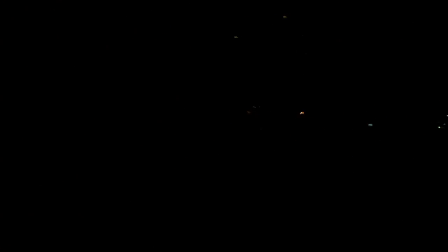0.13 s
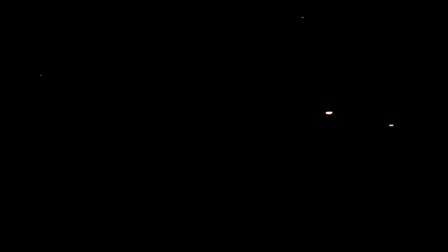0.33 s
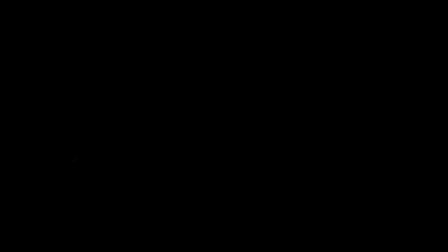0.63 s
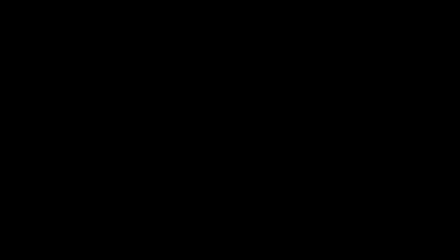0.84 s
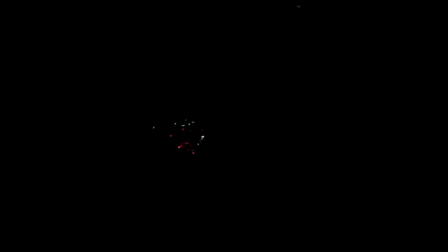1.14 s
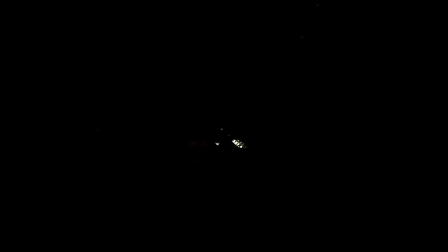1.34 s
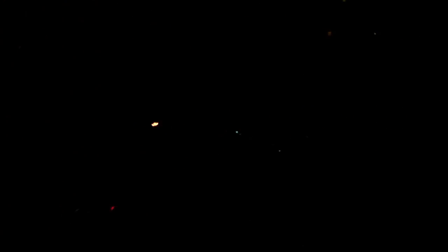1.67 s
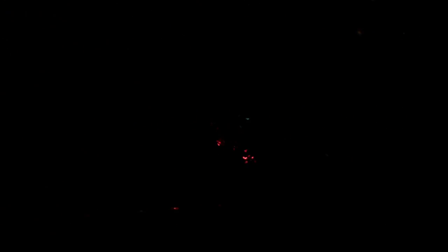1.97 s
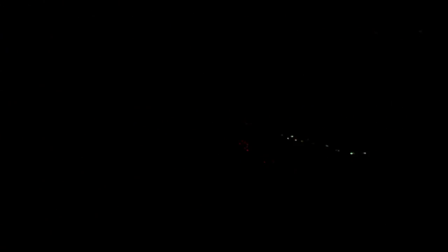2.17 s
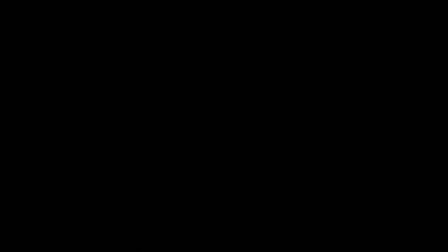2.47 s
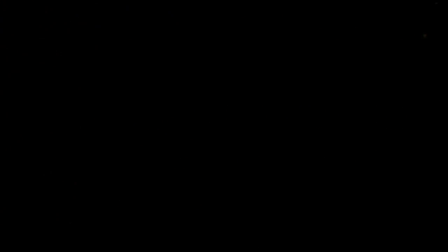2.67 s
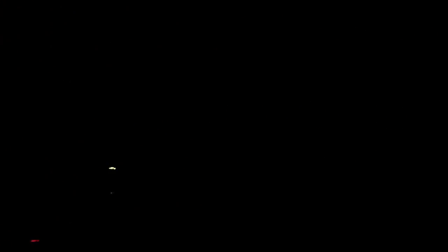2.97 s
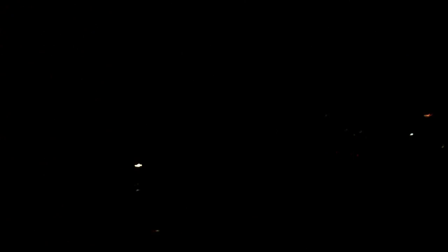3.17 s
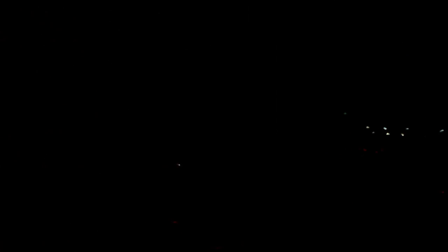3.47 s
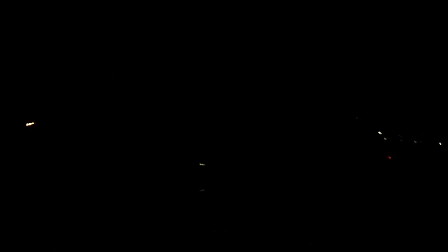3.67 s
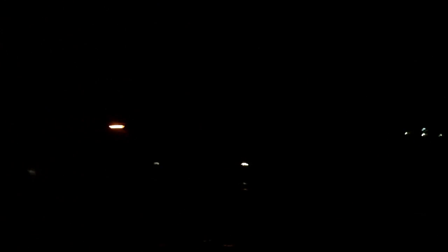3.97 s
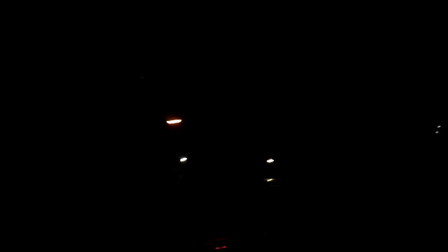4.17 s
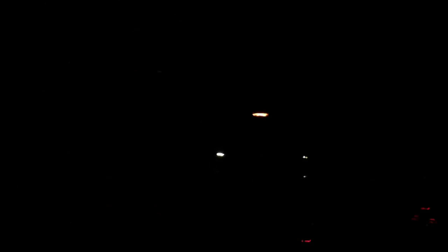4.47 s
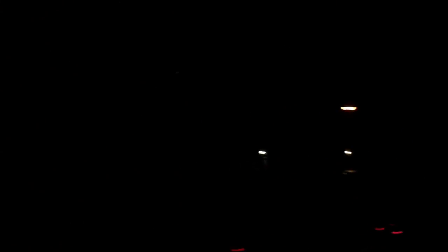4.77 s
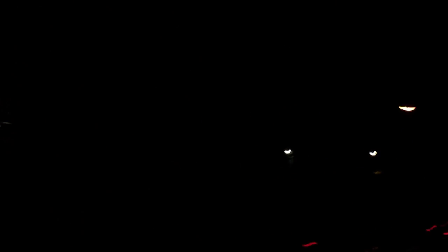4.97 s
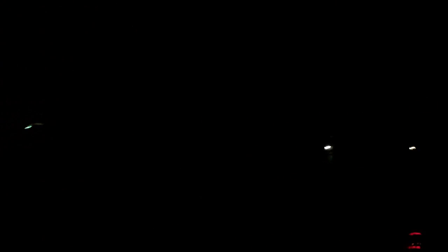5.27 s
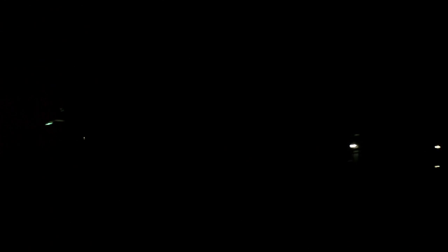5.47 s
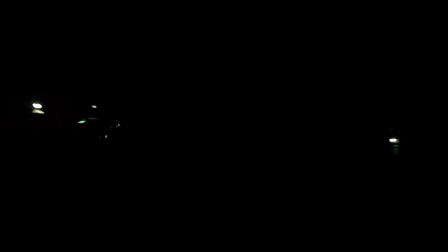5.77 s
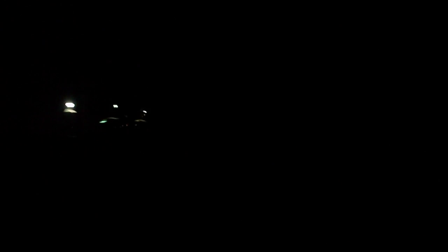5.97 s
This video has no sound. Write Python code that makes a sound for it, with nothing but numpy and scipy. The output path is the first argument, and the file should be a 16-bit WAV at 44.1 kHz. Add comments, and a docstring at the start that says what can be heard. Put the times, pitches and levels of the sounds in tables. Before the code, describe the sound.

A commuter train rumbles and roars heard from on board, with surging air noise, dry knocks of a loose fitting, small ticks and a brief wheel squeal.

```python
"""The running gear of a commuter train rumbles and roars, heard from on board by a window.
Its filtered noise, like the rush of air, builds in surges that break off; jolts boom in the car body.
A loose fitting knocks, bumps ring the floor and small parts tick, all as decaying modes; snaps crackle.
The wheels scrape in narrow noise bands and briefly squeal on one wavering tone."""
import sys
import numpy as np
from scipy import signal
from scipy.fft import rfft, irfft, next_fast_len
from scipy.io import wavfile

SR = 44100
rng = np.random.default_rng(int(sys.argv[2]) if len(sys.argv) > 2 else 0)


def unload_wav(signal):
    """Save mono or channel-first audio to the path in sys.argv[1] as 16-bit WAV at rate SR, clipped to [-1, 1]."""
    wavfile.write(
        sys.argv[1],
        SR,
        np.round(np.clip(np.atleast_2d(signal).T, -1, 1) * 32767).astype(np.int16),
    )


N = 269451
TIME = np.arange(N) / SR  # s

# the louder ticks of small parts in the frame: t/s, relative level/dB
TICK_TIMES = [(0.093, -38), (0.164, -33), (0.3049, -40), (0.314, -41), (0.396, -40), (0.4909, -40),
              (0.5634, -36.5), (0.6332, -39), (0.7438, -38.5), (0.9235, -36), (0.9318, -40), (1.177, -37),
              (1.1874, -34), (1.339, -39.5), (1.4282, -33.5), (1.5878, -36), (1.6253, -36.5),
              (1.8908, -26.5), (1.9252, -37), (1.9915, -40), (2.2413, -30.5), (2.6282, -36),
              (2.7115, -37.5), (2.7378, -38.5), (3.306, -38), (3.332, -37.5), (3.498, -40), (3.785, -39),
              (3.828, -36), (3.8361, -33), (3.871, -39), (4.153, -39), (4.1787, -26.5), (4.271, -39.5),
              (4.5182, -36), (4.587, -35.5), (4.7575, -39), (4.8227, -39), (4.8782, -35), (5.022, -38),
              (5.0944, -36.5), (5.2559, -37), (5.283, -35.5), (5.817, -33.5), (5.9408, -37.5)]


def gain_of(db):
    """Decibels to amplitude."""
    return 10 ** (np.asarray(db) / 20)


def evened(x):
    """Scales to rms 1."""
    return x / np.sqrt(np.mean(x ** 2) + 1e-20)


def add(mix, s, sound):
    """Mixes a sound in at time s."""
    part = mix[max(round(s * SR), 0):][:len(sound)]
    part += sound[:len(part)]


def noise(shape):
    """Noise of rms 1 whose amplitude spectrum follows the function shape(Hz)."""
    size = next_fast_len(N)
    spectrum = rfft(rng.standard_normal(size)) * shape(np.fft.rfftfreq(size, 1 / SR))
    return evened(irfft(spectrum, size)[:N])


def coloured(points):
    """Noise with a spectrum drawn through (Hz, dB) points."""
    hz, db = np.transpose(points)
    return noise(lambda f: gain_of(np.interp(np.log(f + 1), np.log(hz), db)))


def drift(rate_hz):
    """Random wandering of rms 1, fading out above the given rate."""
    return noise(lambda f: np.exp(-(f / rate_hz) ** 2))


def steadied(x, span_s):
    """Takes the slow swells out of a noise and keeps its flutter."""
    window = np.hanning(max(int(span_s * SR), 8))
    power = signal.oaconvolve(x ** 2, window, "same")
    return evened(x / np.sqrt(np.abs(power) + 1e-9))


def ring(modes, spread, contact_s):
    """One blow on a set of modes, swelling over the time of contact; no two blows land alike."""
    t = np.arange(SR // 20) / SR
    sound = np.zeros(len(t))
    for k, (hz, db, t60) in enumerate(modes):
        louder, sharper = rng.standard_normal(2)
        decay = gain_of(db + louder - 60 * t / t60)
        # neighbouring modes swing in opposite senses
        sound += (-1) ** k * decay * np.sin(2 * np.pi * hz * (1 + spread * sharper) * t)
    return sound * (1 - np.exp(-(t / contact_s) ** 2))


def surging(column, cruise_db, stretch, hold_s, release_s, build_shape=1.83):
    """Gain of one layer: each surge builds, holds briefly and collapses to the running level."""
    # surges of noise: break t/s, build time/s (before stretch),
    # then relative level/dB of column 0 air rush, 1 wheel roar, 2 rumble
    surges = [(0.167, 0.061, -46, -28.5, -20.5), (0.314, 0.082, -46, -37, -22.5),
              (0.40, 0.13, -52, -32.5, -29), (0.637, 0.11, -47.5, -31.5, -39),
              (0.744, 0.083, -44, -35, -26.5), (0.927, .026, -43, -33, -21.5),
              (1.185, 0.14, -42.5, -30.5, -26), (1.426, 0.085, -44, -30, -22),
              (1.62, 0.073, -49.5, -34, -26.5), (1.891, 0.12, -38, -29, -21),
              (2.272, 0.16, -47.5, -31.5, -25.5), (2.467, 0.19, -42, -34, -30.5),
              (2.601, 0.082, -36, -22, -23), (2.714, 0.072, -49, -33.5, -32), (2.868, 0.07, -49, -39, -34),
              (3.075, .049, -39, -25, -25.5), (3.246, 0.086, -37.5, -20.5, -21.5),
              (3.322, 0.093, -52, -32.5, -24), (3.50, 0.062, -46, -39, -26.5),
              (3.831, 0.1, -44, -27.5, -21.5), (4.07, 0.13, -48.5, -42, -27.5),
              (4.192, 0.065, -56.5, -29.5, -25), (4.413, 0.029, -44, -33.5, -34),
              (4.518, .08, -52, -31.5, -27.5), (4.588, 0.022, -44.5, -27, -26.5),
              (4.773, 0.063, -45, -26.5, -17.5), (4.821, .036, -42, -26.5, -20.5),
              (4.877, .02, -53, -30.5, -19.5), (5.019, 0.022, -49, -26, -22), (5.093, .036, -52, -39, -29),
              (5.271, 0.096, -53, -32, -28), (5.488, 0.071, -43.5, -32, -27),
              (5.647, 0.09, -37, -25.5, -19.5), (5.812, 0.2, -48, -29, -27.5),
              (5.985, 0.099, -45, -41, -30.5), (6.11, 0.13, -42, -33, -27.5)]
    # running noise between the surges: t/s, level/dB around cruise_db
    cruise = [(0, 2), (0.5, -1), (1.25, -2.5), (2, -2.5), (2.7, 4), (3.4, 1.5), (3.65, 3.5), (3.9, -2.5),
              (4.3, 4), (4.9, -0.5), (5.35, -2.5), (6.11, 1)]
    t = TIME[::64]  # a coarse grid is enough for a level curve
    power = gain_of(cruise_db + np.interp(t, *np.transpose(cruise))) ** 2
    for s, build, *dbs in surges:
        ahead = np.maximum(s - hold_s - t, 0)
        age = np.maximum(t - s, 0)
        # build_shape: 1 = exponential growth, 2 = bell-shaped
        swell = (ahead / (build * stretch)) ** build_shape
        power += (gain_of(dbs[column]) * np.exp(-swell - age / release_s)) ** 2
    return np.interp(TIME, t, np.sqrt(power))


def dips(depth_db=3, fall_s=0.003, recovery_s=0.023):
    """Gain that dips briefly after each of the louder ticks; dips that overlap add up in dB."""
    age = np.maximum(TIME - np.array(TICK_TIMES)[:, :1], 0)
    dip = (1 - np.exp(-age / fall_s)) * np.exp(-age / recovery_s)
    return gain_of(-depth_db * dip.sum(0))


def air(rush_db=6.5, flutter_db=1.74, draught_db=-48, whirl_db=-2.5):
    """Turbulent rush past the window with a wandering midrange whirl, over a faint steady draught."""
    # spectrum of the rush: f/Hz, relative level/dB
    rush_colour = [(200, 8), (600, 7), (950, 6.5), (1400, -2.5), (1800, -1), (2400, -1), (3000, 1),
                   (3550, -8.5), (4400, -7), (6500, -10.5), (8300, -13.5), (9000, -18), (10700, -24),
                   (12000, -45), (13300, -28), (15400, -22), (15800, -48)]
    rush = gain_of(rush_db) * coloured(rush_colour) * gain_of(flutter_db * drift(rate_hz=220))
    whirl = coloured([(500, -29), (1100, 5.5), (2000, 3), (3000, -1.0), (4000, -41.5)])
    whirl *= gain_of(whirl_db + 1.2 * drift(rate_hz=3.0))
    draught = coloured([(300, 3.5), (900, -2.5), (1500, -10.0), (2900, -2.5),
                        (3600, -21.5), (8000, -19.5), (12000, -65)])
    level = surging(0, cruise_db=-52.5, stretch=1.38, hold_s=0.0064, release_s=0.016)
    return level * (rush + whirl) + gain_of(draught_db) * draught


def crackle(count=190, loudest_db=-29, range_db=17, snap_s=0.00055):
    """Tiny dry snaps without any ring, scattered at random."""
    out, t = np.zeros(N), np.arange(SR // 100) / SR
    for when, size, sense in rng.random((count, 3)):
        level = np.sign(sense - .5) * gain_of(loudest_db - range_db * size)
        add(out, when * N / SR, level * np.exp(-t / snap_s))
    return out


def tick_ring():
    """The short, bright ring of a small part: a few quickly decaying modes."""
    # modes of the small parts: f/Hz, relative level/dB, t60/s
    part_modes = [(2350, -27, 0.0012), (4750, 5, 0.0023), (8040, -7.5, 0.0028), (9800, 1, 0.0017),
                  (14100, -4.5, 0.0024)]
    return ring(part_modes, spread=0.0058, contact_s=0.00031)


def rattle(count=70, loudest_db=-34, range_db=13):
    """Many fainter ticks, scattered at random."""
    out = np.zeros(N)
    for when, size in rng.random((count, 2)):
        add(out, when * N / SR, gain_of(loudest_db - range_db * size) * tick_ring())
    return out


def ticks(tick_db=12, push_db=-17, push_s=0.00075, bounce_s=.001, bounce_db=-6):
    """Each tick is a bright ring with a quick bounce, on a dull push."""
    out, u = np.zeros(N), np.arange(SR // 40) / SR / push_s
    push = gain_of(push_db) * (u * np.exp(1 - u)) ** 2
    for (s, db), (lag, sense) in zip(TICK_TIMES, rng.random((len(TICK_TIMES), 2))):
        add(out, s, gain_of(db + tick_db) * tick_ring())
        # the bounce follows after 0.5 to 1.5 times bounce_s
        add(out, s + bounce_s * (.5 + lag), gain_of(db + tick_db + bounce_db) * tick_ring())
        add(out, s, np.sign(sense - .5) * push)
    return out


def bumps(bump_db=0, shove_db=2, shove_rise_s=0.00075, shove_decay_s=0.0036):
    """Short blows from the track shove the floor and ring it."""
    # dull bumps from the track: t/s, relative level/dB
    track_blows = [(.703, -21), (1.9922, -16), (2.241, -21), (4.179, -19), (5.9375, -12)]
    # modes of the floor: f/Hz, relative level/dB, t60/s
    floor_modes = [(164, -3, 0.036), (370, 0, 0.0099), (770, -7.5, 0.0037)]
    out, t = np.zeros(N), np.arange(SR // 20) / SR
    shove = gain_of(shove_db) * (1 - np.exp(-t / shove_rise_s)) * np.exp(-t / shove_decay_s)
    for s, db in track_blows:
        blow = ring(floor_modes, spread=0.1, contact_s=0.00034) + shove
        add(out, s, gain_of(db + bump_db) * blow)
    return out


def knocks(knock_db=8, cabin_db=-21, cabin_t60=0.023):
    """Dry knocks with a faint scatter from the walls; a harder blow favours the high modes."""
    # knocks of a loose fitting: t/s, relative level/dB, hardness/dB per octave
    fitting_blows = [(0.2025, -26, 8), (0.7038, -24.5, -5), (0.7365, -15.5, -1.5), (0.9786, -13.5, 3),
                     (1.1865, -11, 4), (1.4298, -15, 4.5), (1.6176, -15.5, 2), (1.6551, -31, -1),
                     (1.8915, -9, 5.5), (1.918, -19, 3), (2.2409, -21.5, -5), (3.8291, -9.5, 4),
                     (4.033, -17.5, 3), (4.1789, -26, 12.5), (4.207, -15, 5), (4.3986, -20, 0),
                     (4.6385, -16, 4), (4.817, -18.5, 5), (4.8707, -18, 2.5), (5.254, -23.5, 5),
                     (5.2833, -15, 4), (5.9798, -11.5, 3), (6.0504, -25.5, 3)]
    # modes of the fitting: f/Hz, relative level/dB, t60/s
    fitting_modes = [(460, -14.5, 0.01), (882, -12, 0.023), (1359, -4.5, 0.012), (2092, -15, 0.0089),
                     (2870, -19, 0.0032), (5630, -7, 0.0009)]
    pivot_hz = fitting_modes[2][0]  # hardness tilts the modes around this one
    out, t = np.zeros(N), np.arange(SR // 8) / SR
    for s, db, hardness in fitting_blows:
        modes = [(hz, mode_db + hardness * np.log2(hz / pivot_hz), t60)
                 for hz, mode_db, t60 in fitting_modes]
        add(out, s, gain_of(db + knock_db) * ring(modes, spread=0.01, contact_s=0.00038))
    walls = rng.standard_normal(len(t)) * gain_of(-60 * t / cabin_t60)
    scatter = signal.oaconvolve(out, walls / np.linalg.norm(walls))[:N]
    return out + gain_of(cabin_db) * scatter


def scrapes(scrape_db=-1, octave_db=-12, chatter_db=4.0):
    """Stick and slip excite one wheel mode at a time: a chattering, narrow band with its octave."""
    # brief scrapes of wheel on rail: t/s, length/s, f/Hz, half-width/Hz, relative level/dB
    rubs = [(1.35, 0.086, 6800, 700, -49), (2.493, 0.13, 4200, 230, -46.5), (2.998, 0.37, 2170, 140, -47),
            (3.832, 0.33, 2710, 55, -50.5), (4.972, .055, 4230, 260, -45), (5.39, 0.38, 2920, 170, -46.5)]
    out = np.zeros(N)
    for s, length, hz, width, db in rubs:
        band = noise(lambda f: 1 / (1 + ((f - hz) / width) ** 2)
                     + gain_of(octave_db) / (1 + ((f - 2 * hz) / width) ** 2))
        rub = band[:int(length * SR)]
        swell = np.sin(np.linspace(0, np.pi, len(rub)))
        add(out, s, gain_of(db + scrape_db) * evened(rub) * swell)
    return out * gain_of(chatter_db * drift(rate_hz=31))


def wheel_squeal(squeal_db=0, pitch_hz=895, waver=0.0018, octave_db=-24, band_hz=28):
    """A wheel mode sings as the flange rubs: ragged when rough, pure when stick and slip lock to it."""
    # wheel flange rubbing the rail: t/s, level/dB, roughness (limited to 0-1 below)
    flange = [(2.95, -62, 1.1), (3.06, -39, 0.8), (3.19, -34.5, 1), (3.26, -59, 0.7), (5.6, -83, .5),
              (5.66, -29.5, 0.5), (5.685, -23.5, 0.1), (5.705, -23, 0.14), (5.74, -35.5, 0.3),
              (5.79, -40, 1.04), (5.86, -50, 1), (6.11, -74, .7)]
    times, levels, roughness = np.transpose(flange)
    db = np.interp(TIME, times, levels)
    rough = np.clip(np.interp(TIME, times, roughness), 0, 1)
    phase = 2 * np.pi * np.cumsum(pitch_hz * (1 + waver * drift(rate_hz=53))) / SR
    tone = evened(np.sin(phase) + gain_of(octave_db) * np.sin(2 * phase))
    ragged = noise(lambda f: 1 / (1 + ((f - pitch_hz) / band_hz) ** 2))
    # the blend keeps the power constant
    return gain_of(db + squeal_db) * (np.sqrt(1 - rough ** 2) * tone + rough * ragged)


def car_body(shake_db=0.5, jolt_db=-2):
    """Panels boom as the rumble shakes them; each jolt swells them for a few cycles."""
    # body panel resonances: f/Hz, width/Hz, relative level/dB
    panels = [(134.2, 37, -0.5), (173.4, 79, -2.5), (203.3, 15, -6)]
    # jolts of the car body: t/s, level/dB (before jolt_db), f/Hz, swell time/s
    body_jolts = [(0.281, -6, 137, 0.017), (1.811, -5, 145.5, 0.015), (2.177, -13, 172, 0.01),
                  (2.56, -16, 154, 0.029), (2.683, -18.5, 139, 0.028), (3.239, 0.4, 141, 0.0073),
                  (3.439, -9, 138, 0.035), (3.767, -3.5, 156, 0.014), (3.985, -16, 161, 0.018),
                  (4.152, -15, 160, 0.028), (4.563, -8.5, 159, 0.009), (4.686, -6.5, 163, 0.014),
                  (4.735, -8, 156, 0.045)]
    boom = noise(lambda f: sum(gain_of(db) / (1 + ((f - hz) / width) ** 2) ** 2
                               for hz, width, db in panels))
    shaking = surging(2, cruise_db=-30.5, stretch=1.0, hold_s=0.017, release_s=0.017)
    out = gain_of(shake_db) * shaking * steadied(boom, span_s=0.14)
    t = np.arange(SR // 5) / SR
    for s, db, hz, swell in body_jolts:
        envelope = (t / swell * np.exp(1 - t / swell)) ** 2
        add(out, s, gain_of(db + jolt_db) * envelope * np.sin(2 * np.pi * hz * t))
    return out


def running_gear(rumble_db=2.5, roll_db=-0.5, judder_db=2.5):
    """Deep rumble, and the roar of the wheels juddering over uneven rail."""
    # spectrum of the rumble: f/Hz, relative level/dB
    rumble_colour = [(8, -49), (20, 0), (40, -9), (58, 0.5), (80, -8.5), (105, -12), (160, -20), (400, -89)]
    # spectrum of the wheel roar: f/Hz, relative level/dB
    roll_colour = [(100, -63), (190, -11), (250, 0.5), (320, -1.5), (400, -8), (520, -13), (720, -15.5),
                   (900, -17.5), (1150, -25), (2000, -31.5), (5000, -50)]
    shaking = surging(2, cruise_db=-31.5, stretch=1.0, hold_s=0.016, release_s=0.019)
    rolling = surging(1, cruise_db=-38.0, stretch=1.73, hold_s=0.0035, release_s=0.021)
    rumble = gain_of(rumble_db) * shaking * steadied(coloured(rumble_colour), span_s=0.037)
    roll = gain_of(roll_db) * rolling * steadied(coloured(roll_colour), span_s=0.075)
    return rumble + roll * gain_of(judder_db * drift(rate_hz=40))


def scene():
    """Everything as heard at the window; only the running gear and the air dip after ticks."""
    running = (running_gear() + air()) * dips() + car_body()
    small_parts = ticks() + rattle() + crackle()
    wheels = scrapes() + wheel_squeal()
    return (running + knocks() + bumps() + small_parts + wheels)[None]


def record(dry, edge_hz=16000):
    """Full-scale clipping, then a low-pass at edge_hz."""
    lowpass = signal.firwin(255, edge_hz, window=("kaiser", 9), fs=SR)
    return signal.oaconvolve(np.clip(dry, -1, 1), lowpass[None], "same")


dry = scene()
out = record(dry)
unload_wav(out)
```